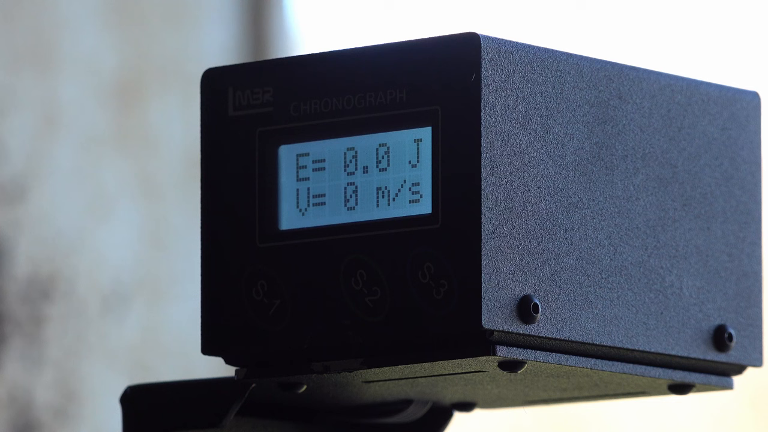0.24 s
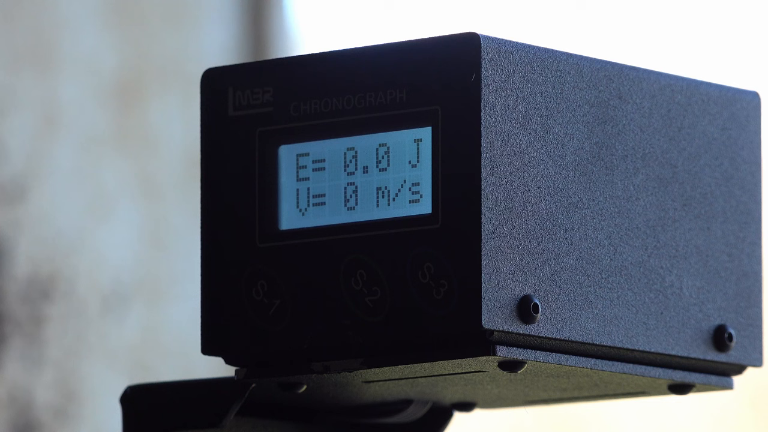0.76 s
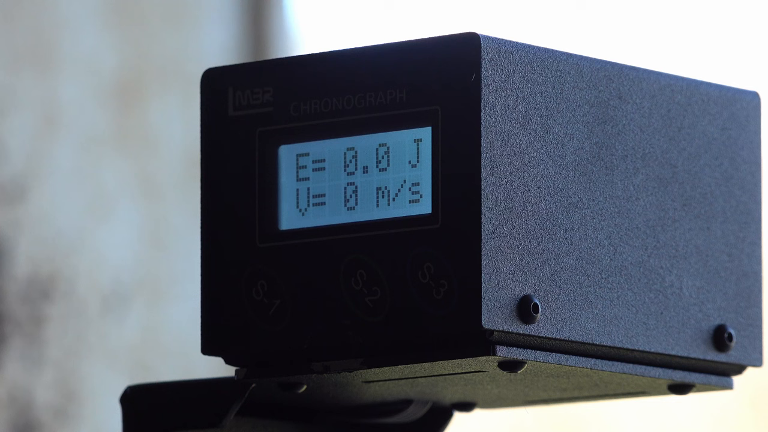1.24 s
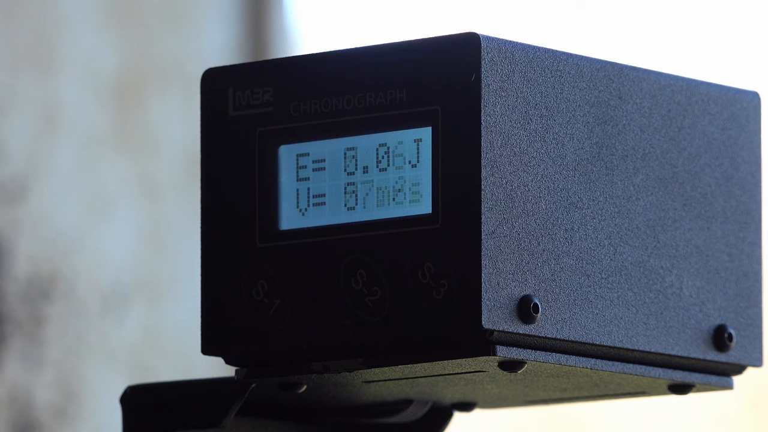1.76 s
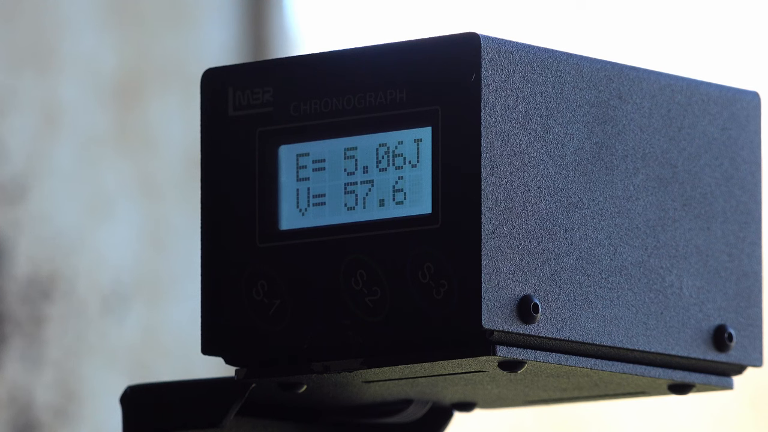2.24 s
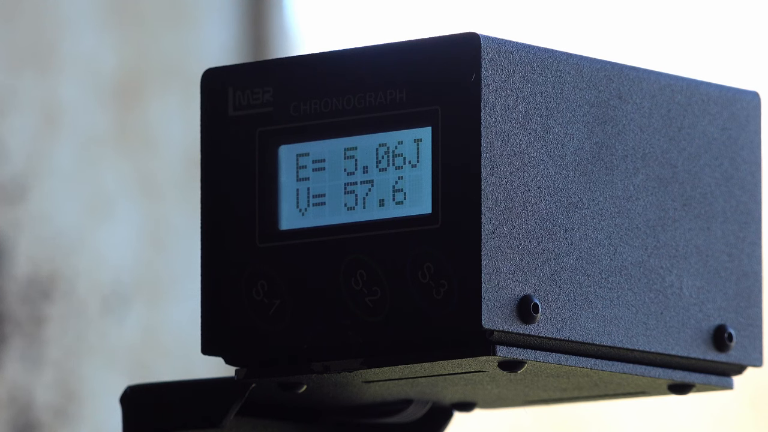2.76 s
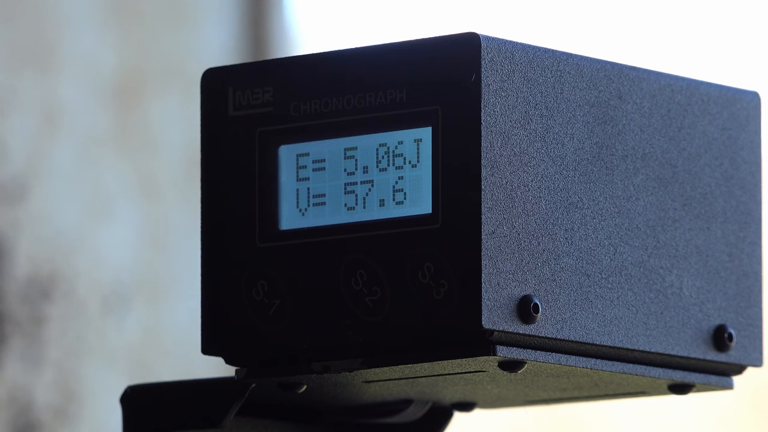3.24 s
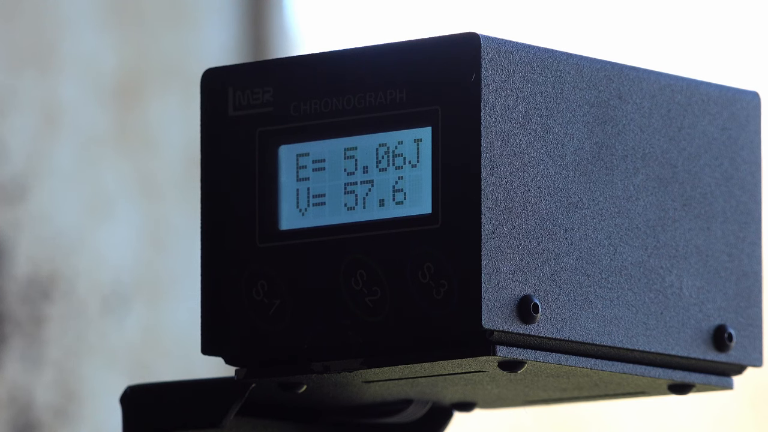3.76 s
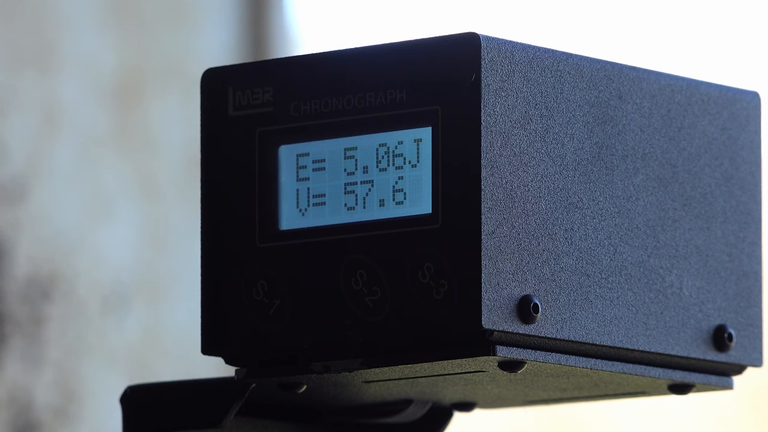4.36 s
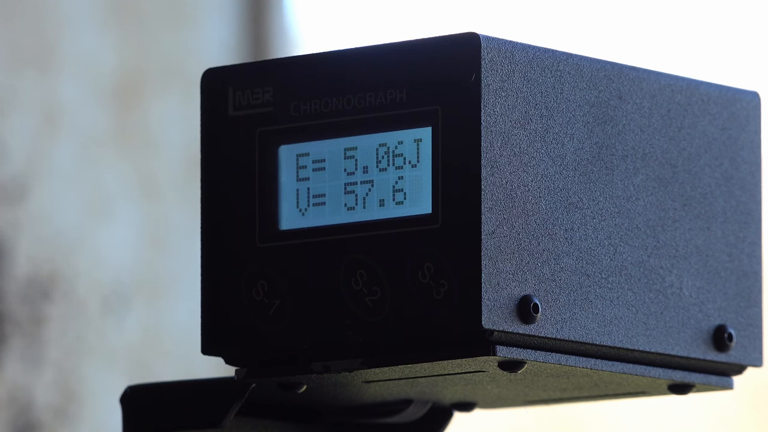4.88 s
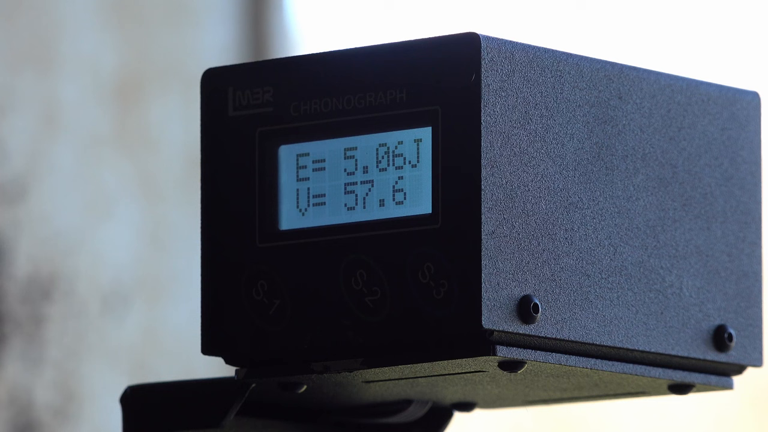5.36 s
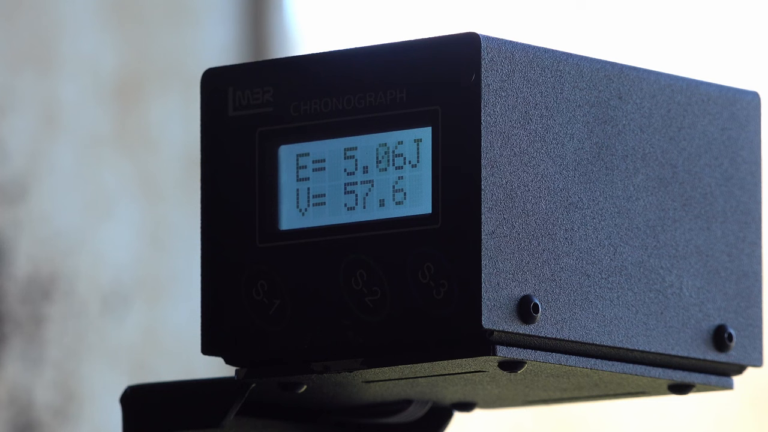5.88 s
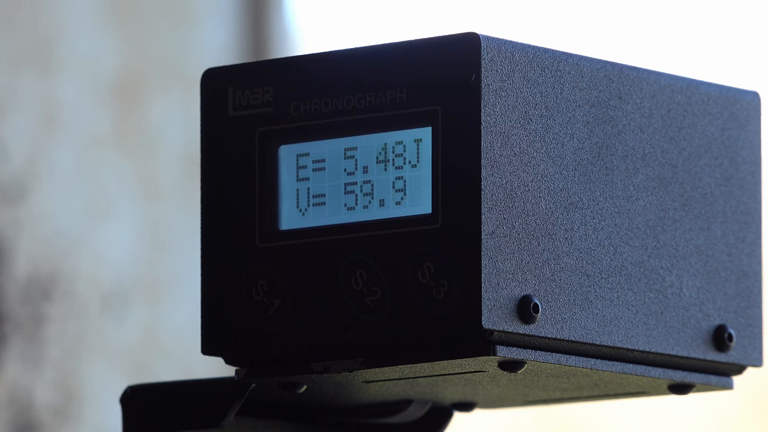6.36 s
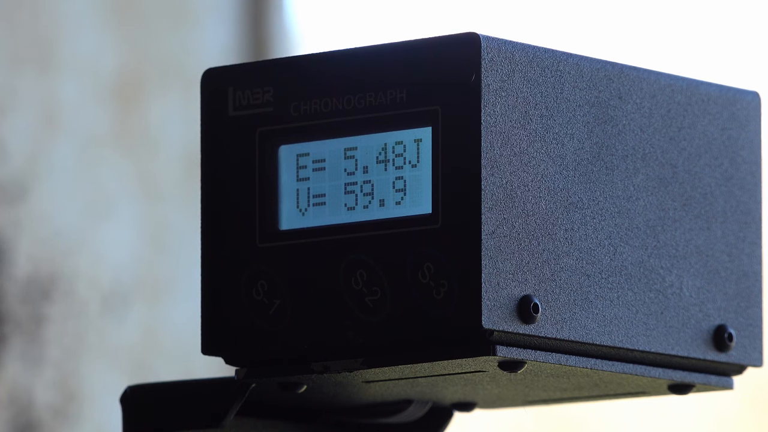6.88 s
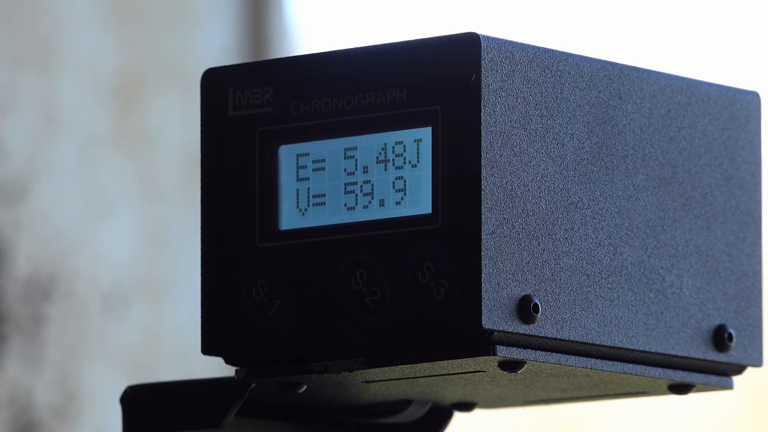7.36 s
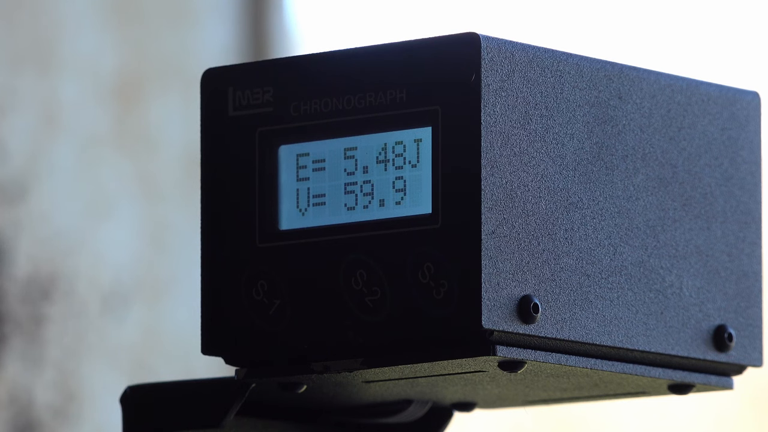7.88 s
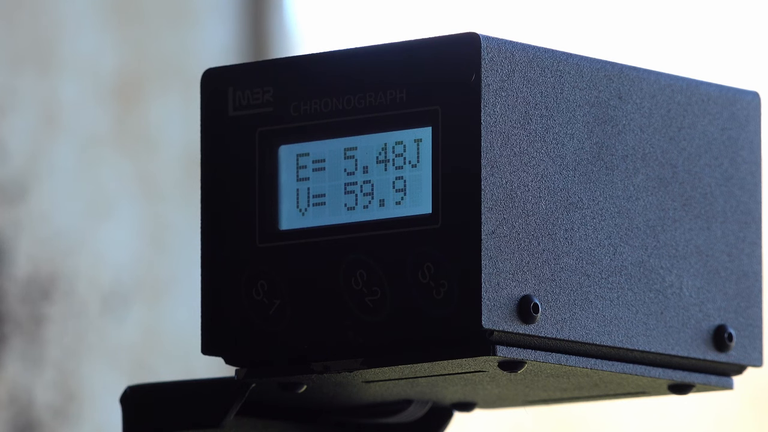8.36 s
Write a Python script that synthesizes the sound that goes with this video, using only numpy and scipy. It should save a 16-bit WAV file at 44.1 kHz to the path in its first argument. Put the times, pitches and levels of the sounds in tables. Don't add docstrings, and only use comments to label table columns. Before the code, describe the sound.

Small hard room with low rumble, room air and thin hiss; a close recorder overloads easily. Faint clock ticks at 0.2 and 1.2 s, a bright grip snap at 0.7. At 1.64 a gas shot cracks, clipped and hollow, with a third-of-a-second wall echo, humming barrel and thin high ring; a ball rattles off a backstop at 1.73-1.76. Dull creaks and a rising palm-slide hiss from 2.0 to 2.6, then the grip racks back with clustered metal clacks at 2.73-2.80 and forward at 3.06-3.13. Faint creaks near 3.6, soft ticks at 4.2 and 5.2. Distant heavy wheels bump from 4.4 and roll until about 6. Tiny sear tick at 5.84, second, softer shot at 5.89, ball rattle at 6.0. Shorter palm slide at 6.2-6.6, rack back at 6.6-6.68, forward at 6.85-6.92 with a lingering metallic ring. Low pipe drone in bursts from 7.9, with one last faint tick at 8.2.

```python
import sys
import numpy as np
from scipy import signal
from scipy.fft import rfft, irfft
from scipy.io import wavfile
from scipy.ndimage import uniform_filter1d

SR = 44100
rng = np.random.default_rng(int(sys.argv[2]) if len(sys.argv) > 2 else 0)


def attenuation_scalar(level_db):
    decades = np.asarray(level_db, float) / 20
    return 10 ** decades


def wav_out(sig):
    wavfile.write(sys.argv[1], SR, np.round(np.clip(np.atleast_2d(sig).T, -1, 1) * 32767).astype(np.int16))


N = 380583

# f/Hz, level/dB per Hz
RUMBLE_SPECTRUM = [(8.8, -29), (15, 3), (27, -1.5), (59, -3.5), (86, -2.5), (123, -17), (250, -12.5),
                   (320, -33.5), (550, -120)]
ROOM_AIR_SPECTRUM = [(71, -43), (120, -8), (177, -5.5), (262, -11), (301, 2), (331, -3), (459, -4),
                     (481, -7), (545, 0.5), (689, -8.5), (1000, -12), (1290, -13.5), (2090, -21),
                     (2480, -30), (5000, -32), (6500, -62.5), (11000, -120)]
HISS_SPECTRUM = [(1180, -29), (2000, -8), (2490, -2), (3710, -4), (15100, -12), (16100, -8), (16500, -35.5)]
# f/Hz, t60/s
WALL_DECAY = [(100, 0.32), (260, 0.31), (700, .32), (1840, 0.33), (4850, 0.32), (12800, .26)]
# t/s, length/s, level/dB, f/Hz
DRONE_BURSTS = [
    (7.9, 0.048, -65.5, 302),
    (8.0, 0.18, -68, 380),
    (8.2, 0.16, -65, 308),
    (8.36, .27, -64, 305),
]
# f/Hz, level/dB per Hz
WHEEL_SPECTRUM = [(18, -46), (30, -14.5), (81, -19), (114, -13), (187, -7.5), (257, 2), (423, 6.5),
                  (672, -4.5), (1030, -9), (1630, -36), (2500, -35), (3250, -64.5), (5500, -120)]
# t/s, level/dB
FLOOR_BUMPS = [
    (4.397, -46),
    (4.588, -54),
    (4.698, -51),
    (4.797, -47.5),
    (4.905, -52),
    (5.165, -60),
    (5.465, -52),
    (5.615, -48),
]
# t/s, peak level/dB
CLOCK_TICKS = [
    (0.1783, -49.5),
    (1.1797, -47),
    (4.1807, -54.5),
    (5.1844, -54.5),
    (8.182, -56),
]
# f/Hz, level/dB per Hz
CASE_SPECTRUM = [(400, -35), (1100, -10), (2000, -6.5), (2700, -9), (3350, 5.5), (4100, -12), (5200, -6.5),
                 (6200, -18.5), (7500, -17), (9500, -36), (16000, -34)]
# t/s, peak level/dB, brightness/dB per octave
GRIP_CREAKS = [
    (0.7, -41.5, 6),
    (0.841, -53.5, -1),
    (1.9898, -45, -5),
    (2.0663, -43.5, -3),
    (3.553, -54, -4),
    (3.7218, -52, -5.5),
    (6.3217, -55.5, -4.5),
]
# f/Hz, level/dB per Hz
SEAR_SPECTRUM = [(500, -29.5), (1400, -9), (2400, -12), (3500, 1), (4500, -10.5), (6500, -11.5),
                 (10000, -19.5), (16000, -36)]
# t/s, level/dB
PALM_SLIDES = [
    [(1.97, -64), (2.122, -50.5), (2.202, -41), (2.4, -43), (2.504, -49), (2.542, -70), (2.628, -53.5),
     (2.7, -66)],
    [(6.2, -57.5), (6.31, -49), (6.36, -51.5), (6.59, -57.5)],
]
GRIP_TOP_HZ = [15000, 5400]
# f/Hz, level/dB per Hz
SKIN_SPECTRUM = [(410, -49), (700, -15), (1110, -9), (1840, -1.5), (2210, -3), (5510, -7.5), (14100, -25.5),
                 (15900, -21.5), (16500, -59.5)]
# t/s, peak level/dB, t60/s
METAL_STRIKES = [(2.707, -33.5, .014), (2.73, -17.5, 0.015), (2.737, -18, 0.0081), (2.7464, -7, 0.09),
                 (2.772, -7.5, .018), (2.783, -0.5, 0.0043), (2.795, -5, 0.021), (2.7961, 5, 0.0073),
                 (2.802, 3.5, .022), (3.057, -10, 0.0077), (3.1075, -13.5, 0.0048), (3.1113, -3.5, .015),
                 (3.1207, -10, 0.003), (3.1294, -.5, .025), (3.1329, -5, .018), (6.597, -38, 0.023),
                 (6.6072, -24, 0.023), (6.625, -10.5, .024), (6.6292, -3, 0.015), (6.6497, -4.5, .022),
                 (6.664, 1, 0.0059), (6.674, -16, 0.017), (6.679, 3, 0.015), (6.683, -0.5, 0.019),
                 (6.8451, -16.5, 0.016), (6.898, -12, 0.0058), (6.902, -3.5, 0.016), (6.918, 4, 0.012)]
# f/Hz, level/dB per Hz
ACTION_SPECTRUM = [(120, -48.5), (250, -24.5), (600, -21), (1100, -9), (1700, -5.5), (4200, -5.5),
                   (6300, -9.5), (8300, -13.5), (9500, -20), (15500, -28.5), (16500, -44)]
# f/Hz, width/Hz, level/dB
SHELL_RESONANCES = [(1260, 150, 4), (1900, 300, 3.5), (2620, 300, 2), (3410, 600, 4), (5250, 700, 5.5),
                    (7600, 700, 5)]
# start t/s, stop t/s, moving level/dB, level at the stop/dB
RAIL_STROKES = [
    (2.74, 2.8, -25.5, -29),
    (3.082, 3.128, -32, -30),
    (6.609, 6.68, -27, -32),
    (6.865, 6.918, -29, -13),
]
# t/s, thump level/dB, frame level/dB
END_STOPS = [
    (2.7966, -28, -30),
    (3.1294, -23.5, -14),
    (6.679, -27, -21.5),
    (6.9181, -27, -13),
]
# f/Hz, level/dB, t60/s
FRAME_MODES = [(600, -7.5, 0.028), (980, -3, 0.02), (1233, 0, 0.05), (1650, -1, .03)]
# t/s, f/Hz, level/dB, t60/s
SPRING_RINGS = [
    (2.796, 13430, -49, .5),
    (3.129, 13430, -44.5, 0.33),
    (3.129, 2622, -67, 2.4),
    (6.917, 2628, -39.5, 1.32),
    (6.919, 13430, -62, .4),
]
# t/s, level/dB, t60/s
BACKSTOP_HITS = [
    (1.731, -13, .12),
    (1.748, -14, .1),
    (1.762, -15, .08),
    (5.992, -20, .05),
    (6.006, -18, .05),
]
# t/s, blast level/dB, metal ring level/dB, bore level/dB
SHOTS = [
    (1.6354, 7, -43, 4),
    (5.8894, -1, -43.5, 2.5),
]
# f/Hz, level/dB per Hz
JET_SPECTRUM = [(35, -51), (60, -23.5), (173, -5), (246, -27), (432, -6.5), (534, -18), (629, -3),
                (1130, -6.5), (1430, -12), (1570, -3.5), (5100, -3.5), (13700, -31), (16500, -52.5)]
# f/Hz, level/dB, t60/s
BORE_MODES = [(123, 1, 0.033), (268, 1, 0.029), (429, 2.5, 0.023), (688, -2.5, 0.14), (1270, -0.5, 0.066),
              (1371, -0.5, 0.07)]
# f/Hz, level/dB per Hz
BARREL_SPECTRUM = [(250, -30.5), (420, -3.5), (1200, 0), (2400, -4), (3600, -4), (5000, -25), (16000, -60)]
# f/Hz, level/dB, t60/s
MUZZLE_MODES = [(13430, -1.5, .54)]
# f/Hz, level/dB, t60/s
BOOM_MODES = [(129, 0, 0.63), (152, -3, 0.77)]
# t/s, depth/dB
DUCKS = [
    (1.64, 17),
    (2.75, 5),
    (2.798, 9),
    (3.131, 8),
    (5.895, 15),
    (6.632, 5),
    (6.682, 8),
    (6.904, 3),
    (6.921, 7),
]

BARREL_HZ = 207
SAG_DB, SAG_RECOVERY_DB_PER_S = 8.5, 2
DIVE_DB_PER_S, RECOVERY_DB_PER_S = 262, 255
ROLL_FROM_S, ROLL_TO_S = 4.79, 5.95


def evened(x):
    return x / np.sqrt(np.mean(x ** 2) + 1e-20)


def read(points, hz):
    f, value = np.transpose(points)
    return np.interp(np.log(hz + 1), np.log(f + 1), value)


def add(mix, s, sound):
    part = mix[round(s * SR):][:len(sound)]
    part += sound[:len(part)]


def clock_of(seconds):
    return np.arange(round(seconds * SR)) / SR


def noise(n=N):
    return rng.standard_normal(n)


def colour(x, points, peaks=()):
    hz = abs(np.fft.fftfreq(8192, 1 / SR))
    bumps_db = sum(db / (1 + (2 * (hz - f) / width) ** 2) for f, width, db in peaks)
    log_gain = np.log(attenuation_scalar(np.maximum(read(points, hz) + bumps_db, -90)))
    taps = np.fft.ifft(np.exp(np.conj(signal.hilbert(log_gain)))).real[:4096]
    return signal.oaconvolve(x, taps / np.linalg.norm(taps))[:len(x)]


def rings(modes, seconds):
    t = clock_of(seconds)
    return sum(attenuation_scalar(db - 60 * t / t60) * np.sin(2 * np.pi * (hz * t + rng.random())) for hz, db, t60 in modes)


def curve(rows):
    s, db = np.transpose(rows)
    return np.interp(np.arange(N) / SR, s, db, -200, -200)


def span(start, stop, rise, fall):
    return np.interp(np.arange(N) / SR, [start, start + rise, stop, stop + fall], [0, 1, 1, 0])


def flutter(seconds):
    return evened(uniform_filter1d(noise(), max(round(seconds * SR), 1)))


def levelled(burst):
    z = rfft(burst)
    smooth_power = abs(uniform_filter1d(abs(z) ** 2, size=25))
    flat = irfft(z / np.sqrt(smooth_power + 1e-20), len(burst))[:len(burst) // 2]
    return flat * np.linalg.norm(burst) / np.linalg.norm(flat)


def sag_db():
    t, depth_db = np.arange(N) / SR, np.zeros(N)
    for s, _ in DUCKS:
        depth_db = np.maximum(depth_db, (t > s) * (SAG_DB - SAG_RECOVERY_DB_PER_S * (t - s)))
    return -depth_db


def air():
    t = np.arange(N) / SR
    linger = sum((t > s) * attenuation_scalar(-58 - 60 * (t - s) / 6) for s, *_ in SHOTS)
    layers = [(RUMBLE_SPECTRUM, attenuation_scalar(-61), 2.0, 1.2),
              (ROOM_AIR_SPECTRUM, attenuation_scalar(-59.5) + linger, 1.5, 1.3),
              (HISS_SPECTRUM, attenuation_scalar(-70), 0.3, 1.05)]
    out = np.zeros(N)
    for spectrum, level, drift_db, share in layers:
        gain = attenuation_scalar(share * sag_db() + drift_db * flutter(0.087))
        out += colour(noise(), spectrum) * level * gain
    return out


def room(x):
    out, at = np.zeros(N), np.arange(100, SR - 10, 10)
    for k in range(3):
        taps = np.zeros(SR)
        build_up = np.minimum(at / (0.01 * SR), 1)
        taps[at + rng.integers(0, 10, len(at))] = rng.choice([-1., 1.], len(at)) * build_up
        hz, t, z = signal.stft(taps, SR, nperseg=256)
        decay = attenuation_scalar(-60 * t / read(WALL_DECAY, hz)[:, None])
        tail = signal.istft(z * decay, SR, nperseg=256)[1]
        share = np.sqrt(2 / 3) * np.cos(np.pi * (np.arange(N) * 120 / SR + k / 3))
        out += signal.oaconvolve(x * share, tail / np.linalg.norm(tail))[:N]
    return out


def drone():
    t, ease_s = np.arange(N) / SR, 0.028
    slow = signal.lfilter([1], [1, -np.exp(-np.pi * 14 / SR)], noise() + 1j * noise())
    slow = slow / np.sqrt(np.mean(slow.real ** 2))
    out = np.zeros(N)
    for s, length, db, hz in DRONE_BURSTS:
        tone = (slow * np.exp(2j * np.pi * hz * t)).real
        out += attenuation_scalar(db) * span(s, s + length, ease_s, ease_s) * tone
    return out


def roll():
    level, t = attenuation_scalar(-49) * span(ROLL_FROM_S, ROLL_TO_S, 0.096, 0.3), clock_of(0.5)
    for s, db in FLOOR_BUMPS:
        add(level, s, attenuation_scalar(db - 60 * t / 0.29) * np.minimum(t / 0.014, 1))
    sag = sag_db()
    after_db = np.minimum(sag - sag[round(ROLL_FROM_S * SR)], 0)
    knocks = noise() * level * attenuation_scalar(2.5 * flutter(0.016) + 1.1 * after_db - 5.5)
    return colour(knocks, WHEEL_SPECTRUM)


def clock():
    out, t = np.zeros(N), np.arange(SR // 8) / SR
    shape = np.minimum(0.4 + t / 0.03, 1) * attenuation_scalar(-60 * np.maximum(t - 0.022, 0) / 0.08)
    for s, peak_db in CLOCK_TICKS:
        add(out, s, attenuation_scalar(peak_db) * shape * noise(len(t)))
    return colour(out * attenuation_scalar(2.0 * flutter(0.0031)), CASE_SPECTRUM)


def creaks():
    out, t = np.zeros(N), clock_of(0.02)
    for s, peak_db, tilt_db in GRIP_CREAKS:
        snap = attenuation_scalar(peak_db - 0.5 - 60 * t / 0.021) * noise(len(t))
        spectrum = [(300, -36), (1300, 8), (5200, 2 * tilt_db), (16000, 4 * tilt_db - 47)]
        add(out, s, colour(snap, spectrum))
    return out


def trigger():
    out, t = np.zeros(N), np.arange(SR // 30) / SR
    level_db = -35 - 60 * np.maximum(t - 0.003, 0) / 0.012
    add(out, 5.8433, attenuation_scalar(level_db) * np.sign(noise(len(t))))
    return colour(out, SEAR_SPECTRUM)


def palm():
    hiss, out = colour(noise(), SKIN_SPECTRUM), np.zeros(N)
    r = np.exp(-np.pi * 190 / SR)
    for rows, top_hz, tube_hz in zip(PALM_SLIDES, GRIP_TOP_HZ, [1700, 1780]):
        slid_s = np.clip(np.arange(N) / SR - rows[1][0] - 0.05, 0, 0.22)
        turns = np.cumsum(tube_hz + 700 * slid_s) / SR
        tube = hiss.copy()
        for k, db in enumerate([7, 5.6, 8.3, 4.6]):
            turn = np.exp(2j * np.pi * (k + 1) * turns)
            tube += attenuation_scalar(db) * (turn * signal.lfilter([1 - r], [1, -r], hiss / turn)).real
        tube = signal.lfilter(*signal.butter(3, min(top_hz, 20000), fs=SR), tube)
        out += evened(tube) * attenuation_scalar(curve(rows) - 8.5)
    return out * attenuation_scalar(1.2 * flutter(0.0025))


def springs():
    out = np.zeros(N)
    for s, *mode in SPRING_RINGS:
        add(out, s, rings([mode], 2.5))
    return out


def thumps():
    out, t = np.zeros(N), clock_of(0.1)
    swing = np.sin(2 * np.pi * 150 * t) * np.exp(-t / 0.0033)
    for s, thump_db, _ in END_STOPS:
        add(out, s, attenuation_scalar(thump_db) * swing)
    return out


def frame():
    out = np.zeros(N)
    for s, _, frame_db in END_STOPS:
        add(out, s, attenuation_scalar(frame_db) * rings(FRAME_MODES, 0.1))
    return out


def strikes():
    out, t = np.zeros(N), clock_of(0.1)
    dulling, hard = signal.butter(2, 3000, fs=SR), 0.87
    for s, peak_db, t60 in METAL_STRIKES:
        grit = np.sign(noise(len(t)))
        grit[14] = 4
        shape = attenuation_scalar(peak_db - 60 * t / t60) * np.minimum(t / 0.00045, 1)
        burst = levelled(shape * grit)
        dull = attenuation_scalar(7.5) * signal.lfilter(*dulling, burst)
        add(out, s, hard * burst + (1 - hard) * dull)
    return out


def rails():
    out, grind = np.zeros(N), noise() * attenuation_scalar(0.83 * flutter(0.0022))
    rise_s, fall_s, edge_db = 0.041, 0.009, -22
    for start, stop, moving_db, stop_db in RAIL_STROKES:
        stroke = [(start, moving_db + edge_db), (start + rise_s, moving_db),
                  (stop, stop_db), (stop + fall_s, stop_db + edge_db)]
        out += grind * attenuation_scalar(curve(stroke))
    return out


def action():
    return colour(strikes() + rails(), ACTION_SPECTRUM, SHELL_RESONANCES)


def backstop():
    out, t = np.zeros(N), clock_of(0.1)
    for s, db, t60 in BACKSTOP_HITS:
        add(out, s, attenuation_scalar(db - 60 * t / t60) * np.minimum(t / 0.002, 1) * noise(len(t)))
    return colour(out, JET_SPECTRUM, [(3370, 1500, 7.4)])


def pipe_peaks(width_hz, db):
    return [(k * BARREL_HZ, width_hz, db) for k in range(2, 21)]


def barrel():
    hum, rim, t = np.zeros(N), np.zeros(N), clock_of(2)
    for s, _, ring_db, _ in SHOTS:
        add(hum, s, attenuation_scalar(ring_db + 1 - 60 * t / 1.3) * noise(len(t)))
        add(rim, s, attenuation_scalar(ring_db - 1.5) * rings(MUZZLE_MODES, 1.5))
        add(rim, s, attenuation_scalar(-32.5) * rings(BOOM_MODES, 1.5))
    return colour(hum, BARREL_SPECTRUM, pipe_peaks(40, 26)) + rim


def shots():
    blast, jet, t = np.zeros(N), np.zeros(N), clock_of(0.5)
    valve_open_s = 0.02
    for s, blast_db, _, bore_db in SHOTS:
        u = t / 0.0007
        add(blast, s + 0.0028, attenuation_scalar(blast_db) * (1 - u) * np.exp(-u))
        add(blast, s + 0.001, attenuation_scalar(bore_db) * rings(BORE_MODES, 0.3))
        flow_db = 8.5 - 150 * t - 60 * np.maximum(t - valve_open_s, 0) / 0.03
        add(jet, s, attenuation_scalar(flow_db) * np.minimum(t / 0.0029, 1) ** 3 * noise(len(t)))
    jet_peaks = [(3360, 580, 4.5), (5250, 720, 5.5), (7500, 1500, 4)]
    return blast + colour(jet, JET_SPECTRUM, jet_peaks + pipe_peaks(70, 6))


def scene():
    shot, ball = shots(), backstop()
    metal = action() + frame()
    hand = palm() + creaks() + trigger()
    tick, far = clock(), roll()
    wet = attenuation_scalar(-5.5) * shot + attenuation_scalar(-36.5) * ball + attenuation_scalar(-1) * metal
    wet += attenuation_scalar(-6.5) * hand + attenuation_scalar(-3) * tick + attenuation_scalar(-2.5) * far
    near = attenuation_scalar(-8.5) * shot + ball + metal + thumps() + attenuation_scalar(-0.5) * (hand + tick + far)
    return (near + room(wet) + barrel() + springs() + drone() + air())[None]


def low_pass(x):
    return signal.sosfilt(signal.butter(12, 16960, fs=SR, output="sos"), x)


def record(dry):
    t, duck_db = np.arange(N) / SR, np.zeros(N)
    for s, depth_db in DUCKS:
        dive_s, recovery_s = depth_db / DIVE_DB_PER_S, depth_db / RECOVERY_DB_PER_S
        times = [0, 0.25 * dive_s, dive_s, dive_s + recovery_s]
        duck_db += np.interp(t - s, times, [0, 0.45 * depth_db, depth_db, 0])
    ceiling = 0.69 * attenuation_scalar(-0.1 * duck_db)
    low_cut = signal.butter(1, 35, "high", fs=SR)
    x = signal.lfilter(*low_cut, dry) * attenuation_scalar(-duck_db) / ceiling
    clipped = ceiling * x / (1 + abs(x) ** 10) ** (1 / 10)
    edge = signal.firwin(301, 16100, window=("kaiser", 9), fs=SR)
    mix = signal.oaconvolve(clipped, edge[None], "same")
    return low_pass(mix)


dry = scene()
out = record(dry)
wav_out(out)
```